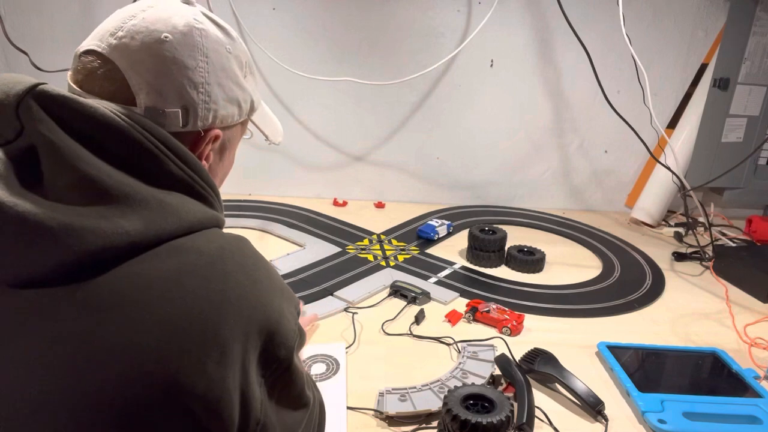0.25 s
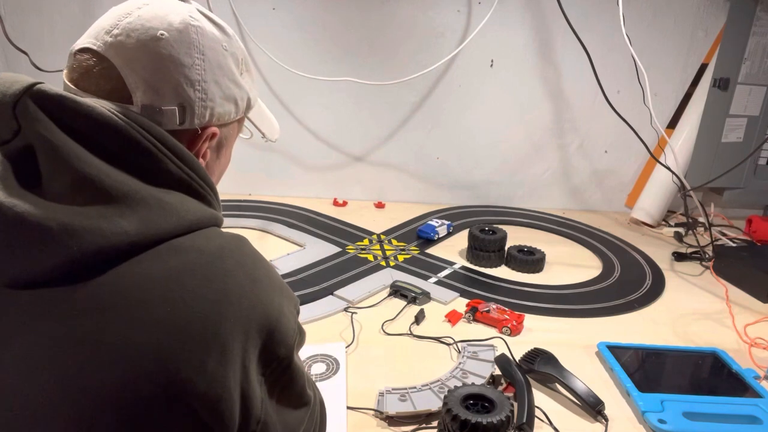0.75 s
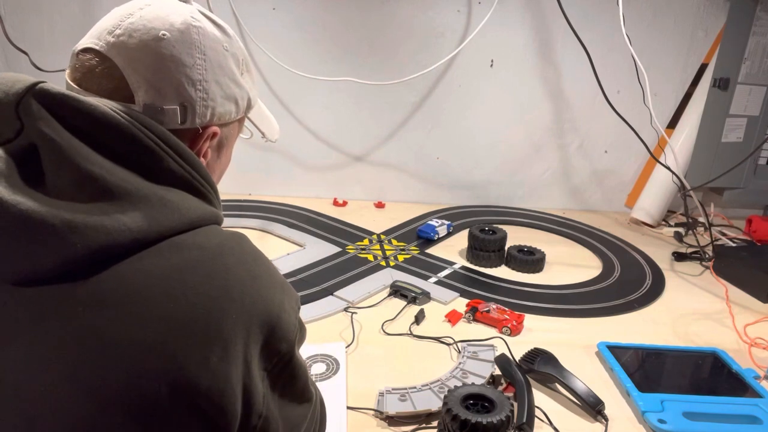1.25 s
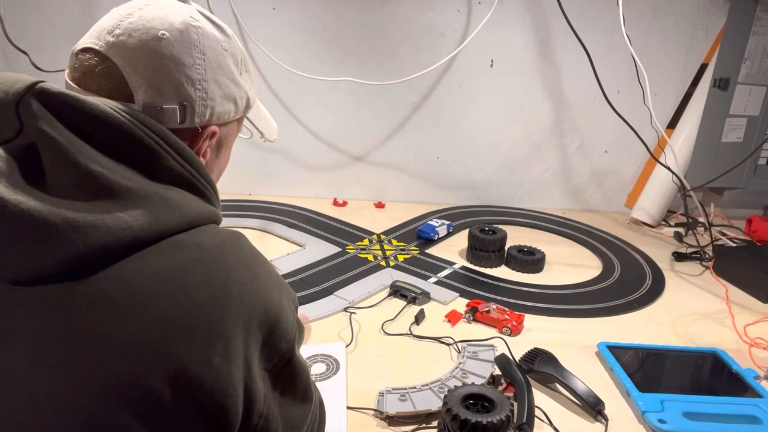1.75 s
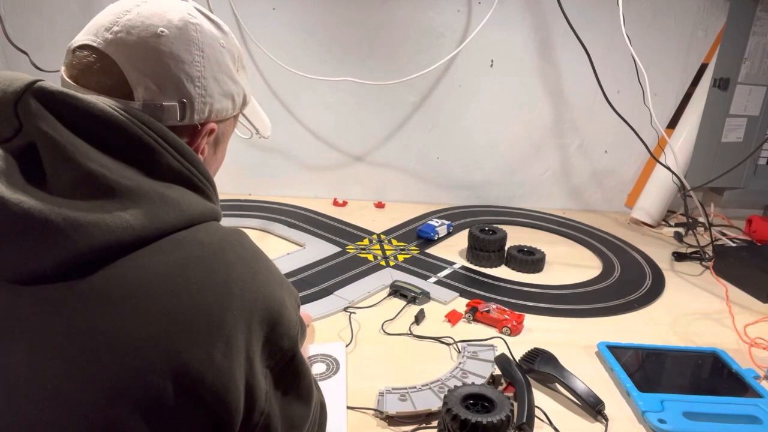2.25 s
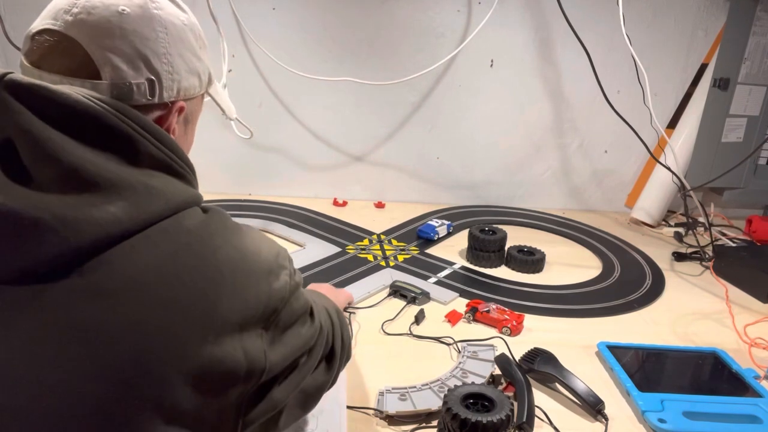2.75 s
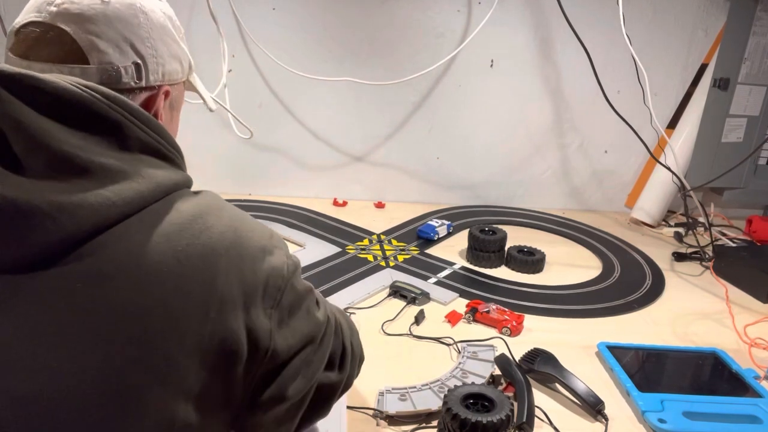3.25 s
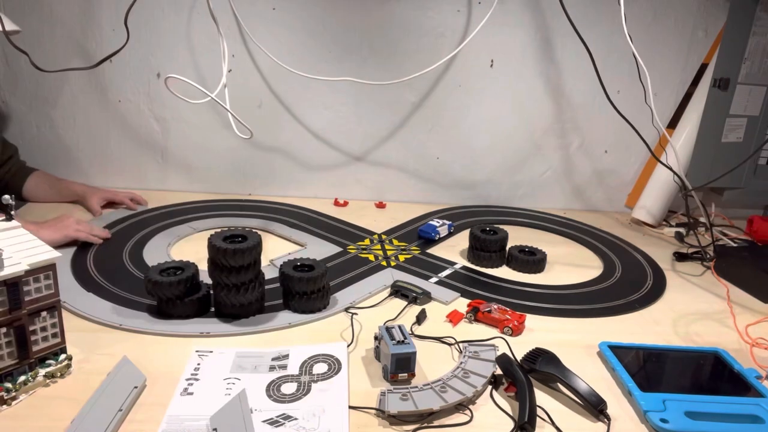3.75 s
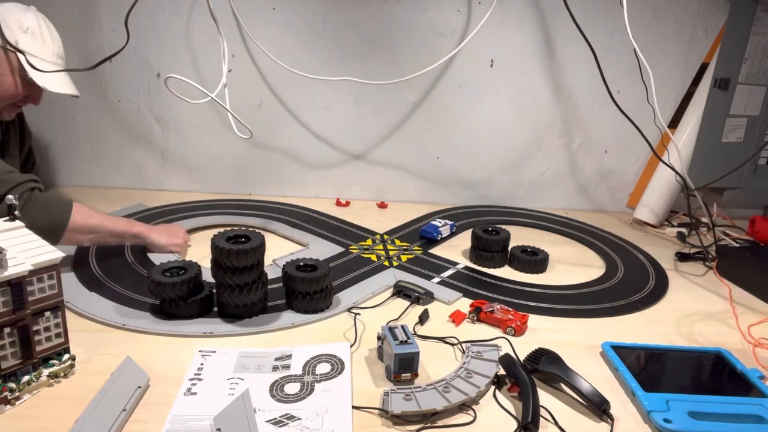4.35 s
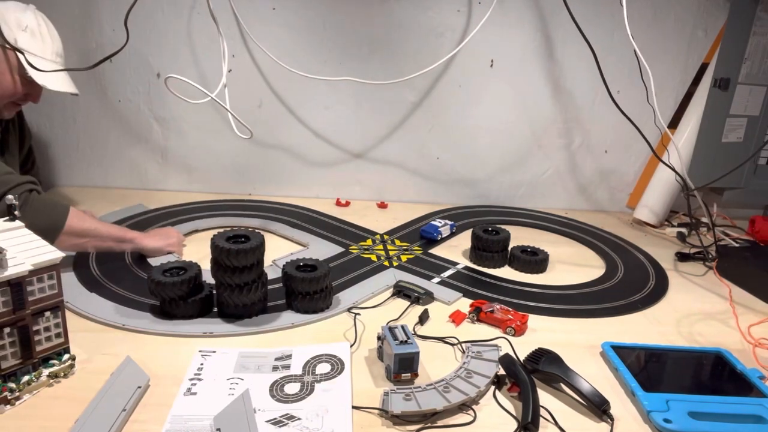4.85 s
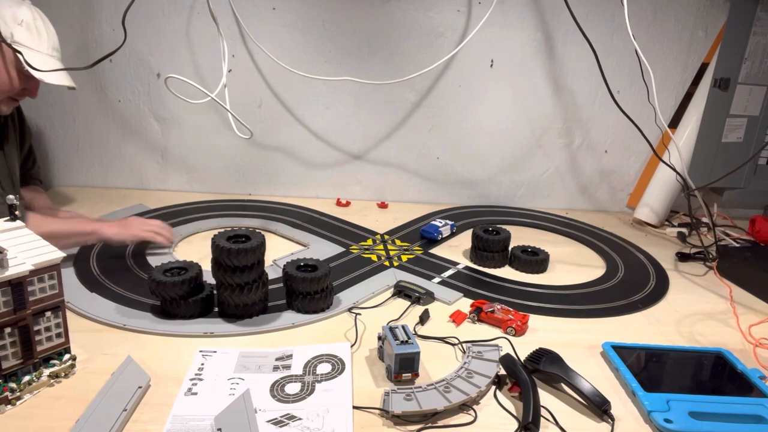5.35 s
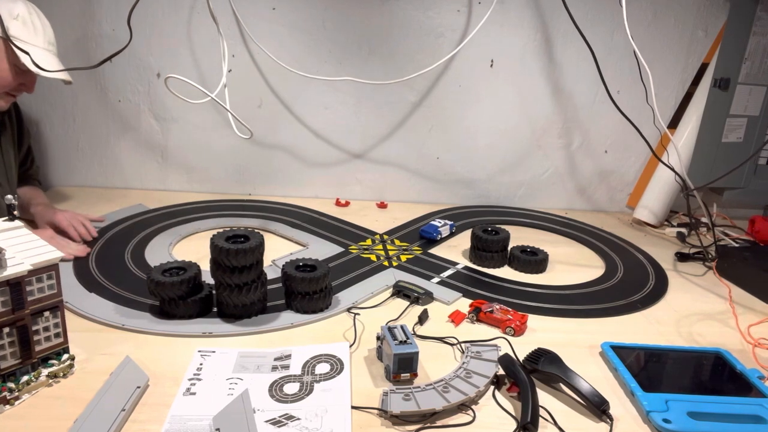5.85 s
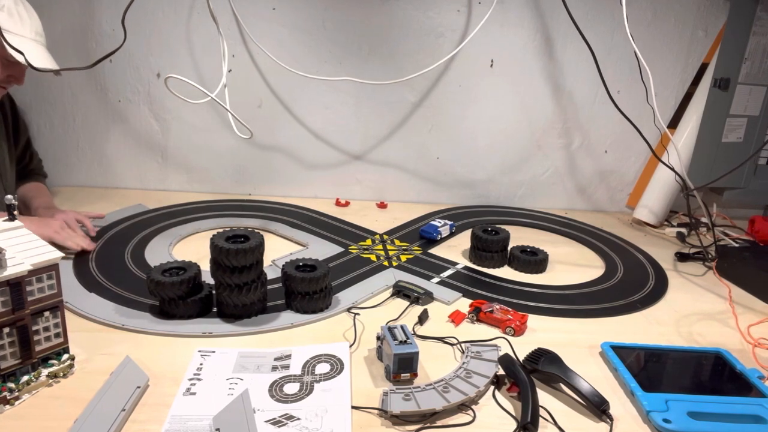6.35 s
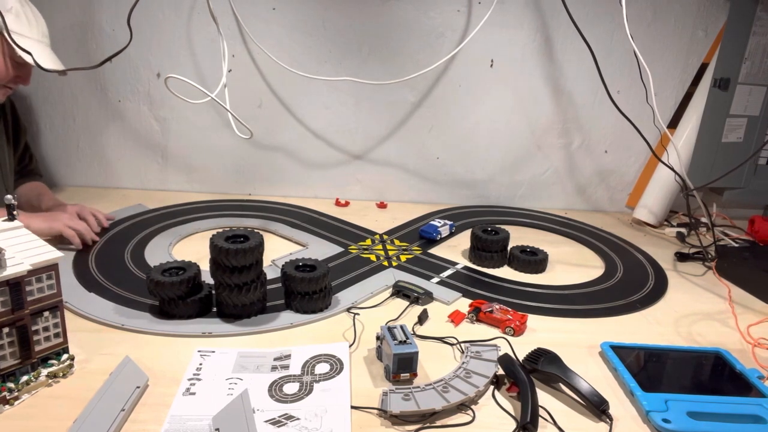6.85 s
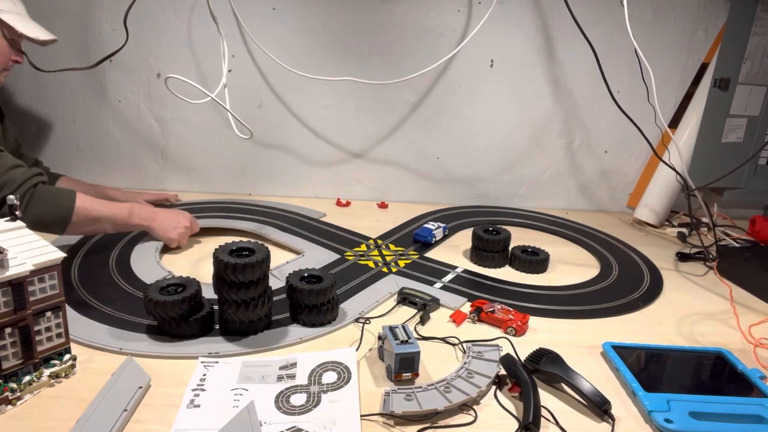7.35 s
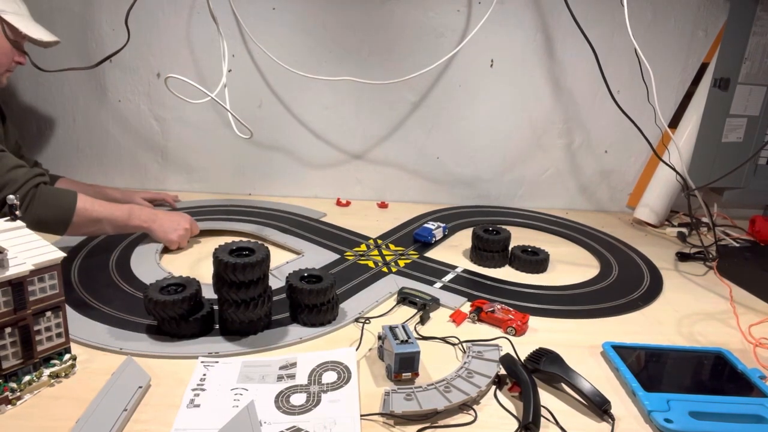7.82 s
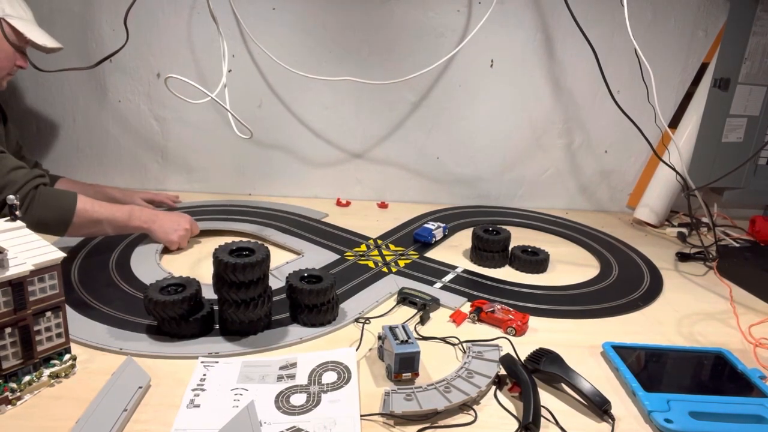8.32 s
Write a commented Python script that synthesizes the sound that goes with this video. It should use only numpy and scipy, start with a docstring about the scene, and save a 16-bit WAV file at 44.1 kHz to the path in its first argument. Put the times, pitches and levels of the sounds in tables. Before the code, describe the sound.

Someone handles rubber toy tires and plastic track on a wooden table, heard close up with short echoes from hard walls. Light ticks and sleeve rubs come first over a steady motor hum. A bright snap and a duller knock precede the hum's sudden end. In the quieter room come light touches, a medium thump, two strong clacks with table resonance, and soft fading taps.

```python
"""Rubber toy tires and plastic track pieces are handled and pressed down on a wooden table in a basement.
Each knock joins a noisy plastic clack, a fading ring of the track, a rubber bump and a thump of the tabletop.
Filtered noise makes the bright ticks, short slides and rustling sleeves; bare walls answer with dense echoes.
Behind this lies quiet room air, and a machine's hum and rumble that stop about a third of the way in."""
import sys
import numpy as np
from scipy import signal
from scipy.fft import rfft, irfft
from scipy.io import wavfile
from scipy.ndimage import uniform_filter1d

SR = 44100
rng = np.random.default_rng(int(sys.argv[2]) if len(sys.argv) > 2 else 0)


def int16_out(signal):
    """Quantize to a 16-bit WAV file."""
    q = np.round(np.clip(np.atleast_2d(signal).T, -1, 1) * 32767)
    wavfile.write(sys.argv[1], SR, q.astype(np.int16))


N = 378466
T = np.arange(N) / SR  # time in the scene, s
AGE = T[:int(.7 * SR)]  # time since the start of one short sound, s

# quiet room air: [f/Hz, relative level/dB]
AIR = [(25, -14), (62, 0.5), (130, -13), (280, -19), (600, -26.5), (1500, -34.5), (3500, -35.5),
       (7000, -40.5), (10000, -43), (13000, -46)]
# rumble of the machine's moving air: [f/Hz, relative level/dB]
RUMBLE = [(25, -31), (50, -15), (72, -9), (95, 0), (140, -10), (200, -14), (320, -17), (520, -25.5),
          (850, -28.5), (1300, -38), (2500, -45), (6000, -56), (12000, -71)]
HUM_HZ, HUM_OFF_S = 120.4, 3.37

# how long echoes last in the bare room: [f/Hz, time to fall by 60 dB/s]
ROOM = [(60, 0.5), (300, 0.34), (1000, 0.29), (2500, 0.23), (6000, 0.24), (12000, 0.08)]
# brief drops in the level of the handling sounds: [t/s]
DIPS_S = [3.385, 4.262, 7.052]
DIP_DB = -29

# colour of rubbing cloth: [f/Hz, relative level/dB]
CLOTH = [(30, 1.5), (65, 17.5), (110, 14), (280, 10), (600, -1.5), (1200, 2), (2300, -1), (3600, -1),
         (6000, -4), (8800, -5.5), (12500, -11.5)]
# strokes of a sleeve or hand: [start t/s, length/s, level/dB]
STROKES = [(-.08, .42, -62.5), (0.334, .27, -62), (0.91, .16, -71), (1.12, .55, -76), (1.692, .17, -68),
           (2.033, .3, -70), (2.328, .08, -63), (2.481, .22, -62.5), (2.754, .3, -64), (3, 0.2, -50.5),
           (3.227, .14, -69), (3.54, .12, -62), (3.7, .3, -63.5), (3.956, 0.18, -66), (4.105, 0.12, -62.5),
           (4.835, .3, -72), (5.043, 0.11, -62.5), (5.109, .13, -50.5), (5.226, .1, -57),
           (5.45, .17, -57.5), (5.564, .16, -71.5), (5.772, .1, -66.5), (5.956, .38, -67),
           (6.318, .36, -52), (6.68, .3, -69.5), (7.07, .17, -71), (7.189, .16, -53), (7.476, 0.079, -66.5),
           (7.629, .1, -73), (7.83, .1, -76.5), (8.015, .09, -65), (8.117, .14, -60.5), (8.331, .22, -63)]
STROKE_EDGE_S, STROKE_CURVE = .012, 1.2  # cloth stirs a little before and after the arm; louder with speed

# plastic sliding briefly on the wood: [start t/s, length/s, level/dB, brightness f/Hz]
SCUFFS = [(2.857, 0.023, -33, 3680), (4.423, 0.046, -58, 2600), (4.473, 0.1, -61.5, 1190),
          (5.269, 0.078, -44, 2800), (5.492, 0.18, -65, 1740), (5.749, 0.094, -58.5, 1005),
          (6.089, 0.028, -35.5, 2040), (6.685, 0.022, -35.5, 1600), (7.065, 0.052, -55.5, 1010),
          (7.224, 0.11, -41.5, 2660), (7.303, 0.026, -49, 1260), (7.488, 0.057, -58, 1305),
          (8.028, 0.065, -58, 1093), (8.129, 0.13, -56.5, 1196)]
# sharp ticks of plastic edges slipping past each other: [t/s, level/dB, pitch f/Hz]
TICKS = [(1.897, -54.5, 5850), (2.2228, -46, 4360), (2.369, -40.5, 1680), (2.387, -45, 1460),
         (2.8681, -19, 8800), (2.8706, -16, 5140), (3.225, -43, 9010), (4.823, -60, 2190),
         (6.1068, -20, 8600), (6.1092, -18, 4700), (6.6997, -18.5, 8000), (6.6995, -20.5, 4410),
         (7.2566, -26, 4600), (7.303, -44, 3000)]
TICK_T60_S = 0.0074

# faint fingertip touches: time span, level before and spread of the random change, brightness, table thump
TOUCH_SPAN_S, TOUCH_DB, TOUCH_SPREAD_DB, TOUCH_HZ, TOUCH_THUMP_DB = (4.5, 8.0), -57.5, 3, 1100, -66.5

# a tire or track piece lands:
# [t/s, clack level/dB, contact brightness f/Hz, rubber bump level/dB, bump pitch f/Hz, table thump level/dB]
KNOCKS = [(1.022, -43.5, 3630, -47, 310, -53), (1.797, -38, 3240, -56, 310, -69),
          (1.819, -42, 1700, -59, 305, -38.5), (2.225, -36.5, 4900, -31, 340, -32.5),
          (2.56, -38.5, 1600, -38.5, 311, -64), (2.763, -42.5, 1700, -47, 303, -31.5),
          (2.8689, -6, 6960, -22, 307, -20.5), (3.2244, -19.5, 2260, -19.5, 313, -30),
          (3.403, -52, 700, -62.5, 301, -46.5), (3.566, -51.5, 1404, -69.5, 302, -55.5),
          (3.611, -44.5, 880, -67.5, 304, -63), (3.743, -44, 1107, -44.5, 287, -48),
          (4.082, -60.5, 605, -52.5, 240, -55), (4.212, -55, 1200, -47.5, 216.6, -51),
          (4.469, -41.5, 2320, -41.5, 336, -63.5), (4.996, -51.5, 1196, -56, 300, -51.5),
          (5.158, -33, 1200, -35, 293, -38.5), (5.204, -38.5, 1510, -55, 300, -37.5),
          (5.302, -26.5, 2370, -24, 274, -20.5), (6.1082, -6, 3780, -8.5, 291, -20.5),
          (6.7016, -8, 3560, -17.5, 321, -23.5), (7.079, -56, 1100, -53, 300, -48),
          (7.142, -43, 1484, -42.5, 291, -51), (7.2565, -36.5, 7000, -32, 322, -62),
          (7.306, -28.5, 1800, -25, 317, -41), (7.435, -42, 1770, -46, 340, -56),
          (7.651, -56, 1986, -55.5, 301, -70), (7.850, -55.5, 1410, -48.5, 319, -62),
          (8.029, -51, 1530, -58.5, 300, -67), (8.080, -39.5, 980, -36, 348, -51),
          (8.186, -46, 1520, -40, 325, -51), (8.225, -50, 1000, -41, 320, -50),
          (8.278, -49, 908, -50, 281, -55)]
# colour of a hard plastic clack: [f/Hz, relative level/dB]
CLACK = [(40, -18.5), (120, -9.5), (200, -7.5), (450, 0.5), (700, -1.5), (1300, -5), (2400, -9.5),
         (3000, -11), (3900, -13), (5000, -13), (6200, -18.5), (8500, -12.5), (12500, -18)]
# ringing tones of the track lying on the table, before scatter: [f/Hz, level/dB, time to fall by 60 dB/s]
TRACK = [(116, -7.5, 0.23), (160, -19.5, 0.42), (220, -10, 0.24), (269, -5.5, 0.17), (301, -6, .24),
         (343.4, -2, 0.19), (440, -11, 0.16), (453, -10.5, 0.095), (685, -15.5, 0.043), (790, -18, 0.053),
         (837, -16, .17), (1029, -17.5, 0.22), (1132, -19.5, 0.15), (1283, -18.5, 0.067),
         (1360, -15, 0.081), (1630, -21.5, 0.077), (1906, -24, 0.071), (1933, -22, 0.073),
         (2250, -23.5, 0.27), (2490, -25, 0.14)]
# ringing tones of the tabletop, before scatter: [f/Hz, level/dB, time to fall by 60 dB/s]
TABLE = [(64.1, 6, 0.27), (57.4, -9, 0.4), (71.3, -11, 0.69), (90, -3, 0.12)]
RING_DB = -11  # ring of the track, relative to the clack
# the far edge lands just after, weaker and duller (share of the brightness)
REBOUND_S, REBOUND_DB, REBOUND_DULLING = .006, -7.5, 0.38
BUMP_LAG_S, BUMP_T60_S = .009, 0.097  # the rubber gives way, then springs back
THUMP_LAG_S = 0.013  # the heavy tabletop is slow to move

RIGHT_LAG = 5  # samples by which the direct sound reaches the right ear later
TOP_HZ = 12800  # upper limit of the microphone


def undb(db):
    """Turn decibels into a gain."""
    return 10 ** (np.asarray(db) / 20)


def unit(x):
    """Scale to an average strength (rms) of 1."""
    return x / np.sqrt(np.mean(x ** 2))


def bins(x):
    """List the frequencies in the spectrum of x, kept at 1 Hz or more."""
    return np.maximum(np.fft.rfftfreq(x.shape[-1], 1 / SR), 1)


def lookup(hz, points):
    """Read a table between its points, along a log-frequency axis."""
    f, value = np.transpose(points)
    return np.interp(np.log(hz), np.log(f), value)


def shape(x, gain):
    """Filter by one gain per frequency."""
    return irfft(rfft(x) * gain, x.shape[-1])


def colour(x, points):
    """Weight the frequencies of x by a table, at rms 1."""
    return unit(shape(x, undb(lookup(bins(x), points))))


def fade(t60):
    """Die away evenly in decibels, by 60 dB in t60 seconds."""
    return undb(-60 * AGE / t60)


def walk(rate, size=N):
    """Wander smoothly at random, with a spread near 1."""
    hold = int(SR / rate)
    steps = np.repeat(rng.standard_normal(size // hold + 1), hold)
    return unit(uniform_filter1d(steps, hold)[:size])


def diffuse(size, split_hz):
    """Make stereo noise from all sides: alike in the bass, unrelated well above split_hz."""
    mid, side = rng.standard_normal((2, size))
    alike = 1 / (1 + (bins(mid) / split_hz) ** 2)
    mid = shape(mid, np.sqrt(1 + alike))
    side = shape(side, np.sqrt(1 - alike))
    return unit(np.array([mid + side, mid - side]))


def add(track, s, sound):
    """Mix a sound in at time s."""
    i = int(s * SR)
    track[i:i + len(sound)] += sound[:max(N - i, 0)]


def closing():
    """Hold full level for a quarter of the short sound, then fade to silence by its half."""
    return np.clip(2 - 4 * AGE / AGE[-1], 0, 1)


def even(x, width_hz):
    """Level out the chance peaks in the spectrum of a decaying burst."""
    power = uniform_filter1d(np.abs(rfft(x)) ** 2, max(int(width_hz * len(AGE) / SR), 1))
    return shape(x, np.sqrt(power.mean() / (power + 1e-12))) * closing()


def soften(x, hz):
    """A softer contact loses the treble above hz."""
    return signal.lfilter(*signal.butter(2, min(hz, SR * .45), fs=SR), x)


def air():
    """The quiet room is coloured noise, with a thin electrical whine of noise close to one pitch."""
    noise = diffuse(N, split_hz=350)
    whine = unit(shape(noise, 1 / (1 + ((bins(noise) - 9000) / 70) ** 2)))
    return colour(noise, AIR) * undb(-68 + 1.3 * walk(2.3)) + undb(-92) * whine


def machine():
    """A motor hums at twice the mains rate over a rumble of moving air, a little to the right."""
    rumble = colour(diffuse(N, split_hz=310), RUMBLE) * undb(-42.0 + 1.4 * walk(6.5))
    hum = np.sqrt(2) * np.sin(2 * np.pi * HUM_HZ * T) * undb(-44.5 + 0.37 * walk(12.0))
    running = np.clip((HUM_OFF_S - T) / 0.023, 0, 1)
    left, right = (rumble + hum) * running
    return np.array([np.pad(left, (2, 0))[:N], right])  # the left ear hears it two samples later


def room_response():
    """Near walls send back dense echoes, unrelated at the two ears above the bass; the top treble dies first."""
    noise = rng.standard_normal((2, len(AGE)))
    hz = bins(noise)
    centres = np.geomspace(60, 14000, 9)
    tail = 0
    for centre, weights in zip(centres, np.eye(len(centres))):
        band = shape(noise, np.interp(np.log(hz), np.log(centres), weights))
        tail = tail + band * fade(lookup(centre, ROOM))
    first_echo = np.clip((AGE - .002) / 0.00095, 0, 1)
    mid, side = even(tail * first_echo, width_hz=70)
    side = shape(side, hz / np.hypot(hz, 170))
    return np.array([mid + side, mid - side]) / np.sqrt(2 * np.sum(mid ** 2))


def basement(x):
    """The echo pattern blends from one to the next as the hands move from spot to spot."""
    spots_s = [2.9, 5.3, 6.15, 6.7, 8.2]
    out = 0
    for weights in np.eye(len(spots_s)):
        share = np.sqrt(np.interp(T, spots_s, weights))
        out = out + signal.oaconvolve((x * share)[None], room_response(), axes=1)[:, :N]
    return out


def dip():
    """The level of the handling sounds dips briefly a few times."""
    depth = sum(np.interp(T - s, [-.016, 0, .025], [0, 1, 0]) for s in DIPS_S)
    return undb(DIP_DB * depth)


def sleeves():
    """Countless fibres catch and slip; in each stroke the arm speeds up and slows, and the pressure wavers."""
    power = np.zeros(N)
    for s, length_s, db in STROKES:
        progress = (T - s + STROKE_EDGE_S) / (length_s + 2 * STROKE_EDGE_S)
        moving = (progress > 0) & (progress < 1)
        speed = np.sin(np.pi * progress[moving])
        power[moving] += (undb(db) * speed ** STROKE_CURVE) ** 2
    slips = rng.standard_normal(N) * undb(2.0 * rng.exponential(size=N))
    return colour(slips, CLOTH) * np.sqrt(power) * undb(0.7 * walk(39))


def clatter(envelope):
    """Countless tiny plastic contacts make noise that follows an envelope."""
    burst = even(rng.standard_normal(len(AGE)) * envelope, width_hz=47)
    gain = undb(lookup(bins(burst), CLACK))
    return shape(burst, unit(gain)) * closing()


def scuffs():
    """Pieces stick and slip as they slide, so the noise swells, flutters and fades."""
    out = np.zeros(N)
    for s, length_s, db, bright_hz in SCUFFS:
        stroke = np.sin(np.pi * np.minimum(AGE / length_s, 1))
        flutter = undb(3.9 * walk(220, size=len(AGE)))
        add(out, s, undb(db) * soften(clatter(stroke * flutter), bright_hz))
    return out


def ticks():
    """A plastic edge snaps free with a short, bright burst of noise around one pitch."""
    out = np.zeros(N)
    for s, db, hz in TICKS:
        peak = signal.iirpeak(hz, 1.4, fs=SR)
        edge = rng.standard_normal(len(AGE))
        edge = signal.lfilter(*peak, signal.lfilter(*peak, edge))
        decay = fade(TICK_T60_S) + undb(-21.5) * fade(t60=0.084)
        add(out, s, undb(db) * unit(edge) * decay)
    return out


def ring(modes, build_s, scatter):
    """Fading tones build up as the blow spreads; each blow excites them a little differently."""
    hz, db, t60 = np.transpose(modes)[:, :, None]
    detune, size = rng.standard_normal((2, len(modes), 1))
    sign = (-1) ** np.arange(len(modes))[:, None]
    level = sign * undb(db + 2 * size * scatter)
    pitch_hz = hz * (1 + 0.014 * scatter * detune)
    waves = level * fade(t60) * np.sin(2 * np.pi * pitch_hz * AGE)
    return waves.sum(0) * (1 - np.exp(-(AGE / build_s) ** 2))


def clack(db, bright_hz):
    """In one contact, plastic chatters for a few milliseconds, mostly below its brightness limit."""
    rise_s = np.interp(db, [-45, -20], [.003, .0003])  # gentle touches settle more slowly
    rattle = undb(2.5 * walk(500, size=len(AGE)))  # loose joints touch and part again
    decay = fade(t60=0.043) + undb(-19) * fade(t60=0.072)
    chatter = clatter(decay * (1 - np.exp(-AGE / rise_s)) * rattle)
    return undb(db) * (soften(chatter, bright_hz) + undb(-28) * chatter)


def bump(hz):
    """Rubber lands in a few quickly fading cycles of three tones."""
    tones = [(hz, -2, BUMP_T60_S), (hz * 0.78, -6, BUMP_T60_S), (hz * 1.4, -10, BUMP_T60_S)]
    return ring(tones, build_s=0.0024, scatter=0.34)


def touches(count=12):
    """Fingertips brush the track at uneven intervals and barely stir the table."""
    out = np.zeros(N)
    first_s, last_s = TOUCH_SPAN_S
    for k in range(count):
        s = first_s + (last_s - first_s) * (k + rng.random()) / count
        tap = clack(TOUCH_DB, TOUCH_HZ)
        tap = tap + undb(TOUCH_DB + RING_DB) * ring(TRACK, build_s=0.0056, scatter=.4)
        thump = undb(TOUCH_THUMP_DB) * ring(TABLE, build_s=0.014, scatter=0.34)
        add(out, s, undb(TOUCH_SPREAD_DB * rng.standard_normal()) * (tap + thump))
    return out


def knocks():
    """A piece clacks down and rebounds, the track rings, the rubber gives, and the heavy tabletop follows late."""
    plastic, wood = np.zeros((2, N))
    for s, clack_db, bright_hz, bump_db, bump_hz, thump_db in KNOCKS:
        add(plastic, s, clack(clack_db, bright_hz))
        add(plastic, s + REBOUND_S, clack(clack_db + REBOUND_DB, bright_hz * REBOUND_DULLING))
        add(plastic, s, undb(clack_db + RING_DB) * ring(TRACK, build_s=0.0043, scatter=.4))
        add(plastic, s + BUMP_LAG_S, undb(bump_db) * bump(bump_hz))
        add(wood, s + THUMP_LAG_S, undb(thump_db) * ring(TABLE, build_s=0.01, scatter=0.31))
    return plastic, wood


def scene():
    """The work goes on to the left: plastic and cloth reach the right ear a little later, though louder there."""
    plastic, wood = knocks()
    plastic = plastic + ticks() + scuffs() + touches()
    cloth = sleeves()
    near = plastic + cloth
    left = undb(0.1) * near
    right = undb(4.0) * np.pad(near, (RIGHT_LAG, 0))[:N]
    direct = np.array([left, right]) + wood  # the thump is equal at both ears
    into_room = undb(-1.0) * plastic + undb(-12.5) * wood + undb(1.0) * cloth
    echoes = basement(into_room) * undb([[-.3], [.3]])
    return (direct + echoes) * dip() + machine() + air()


def record(dry):
    """The microphone thins the deepest bass, rounds the highest peaks and cuts the top."""
    thin = signal.sosfilt(signal.butter(3, 42, "high", fs=SR, output="sos"), dry)
    rounded = np.tanh(thin)
    return signal.sosfilt(signal.ellip(8, .2, 70, TOP_HZ, fs=SR, output="sos"), rounded)


dry = scene()
out = record(dry)
int16_out(out)
```